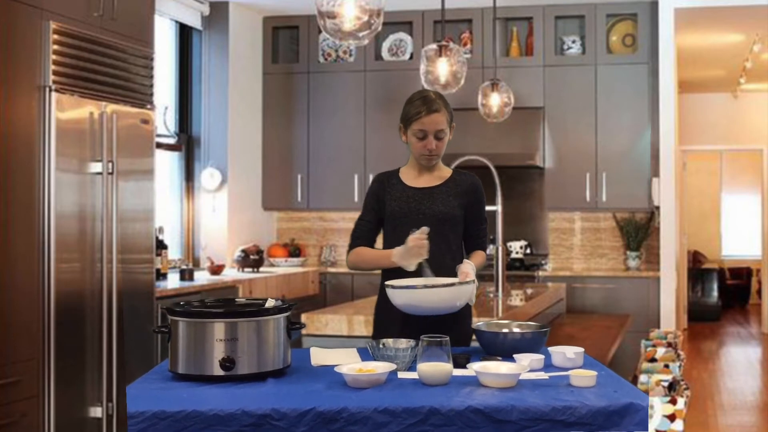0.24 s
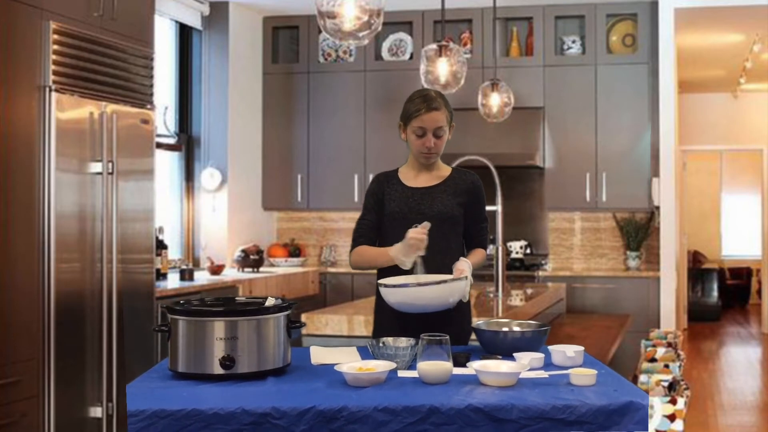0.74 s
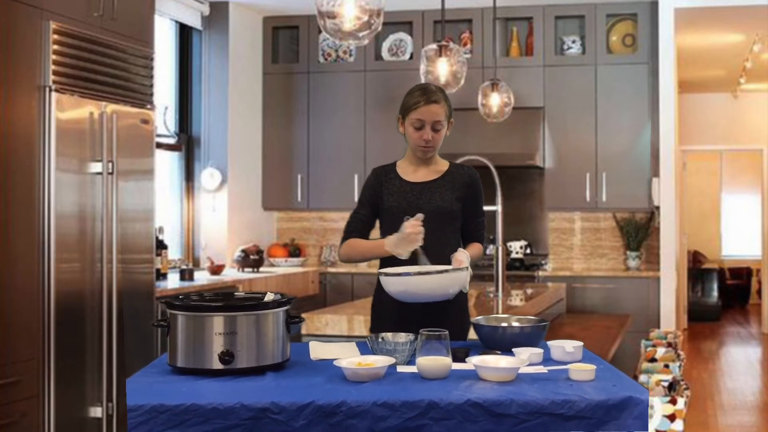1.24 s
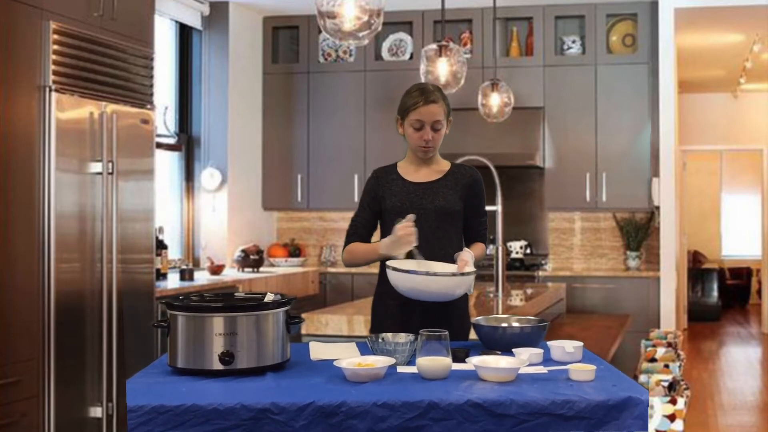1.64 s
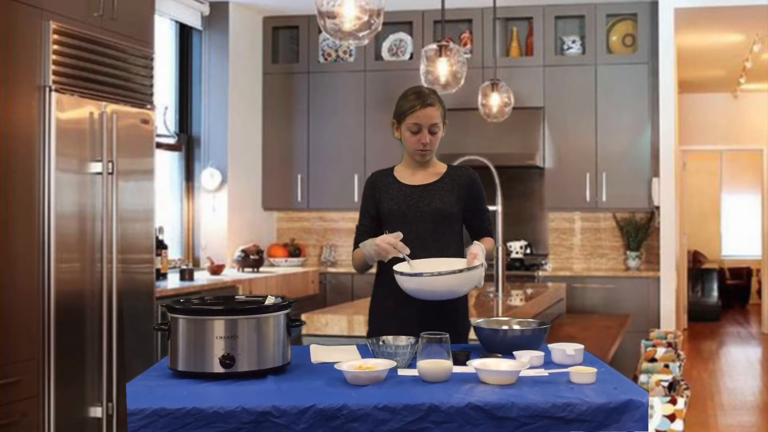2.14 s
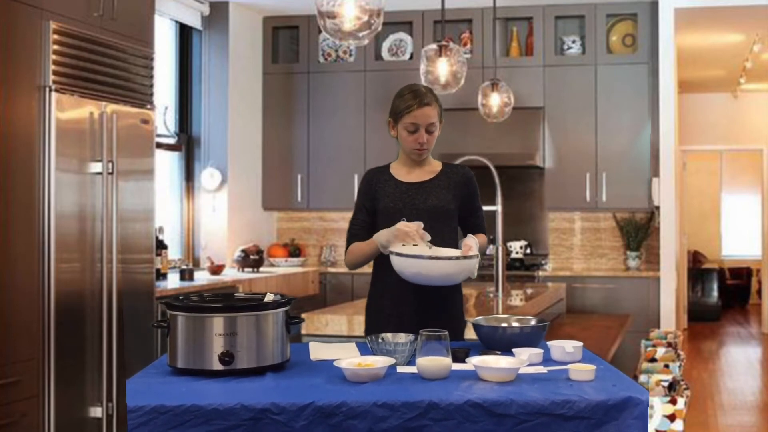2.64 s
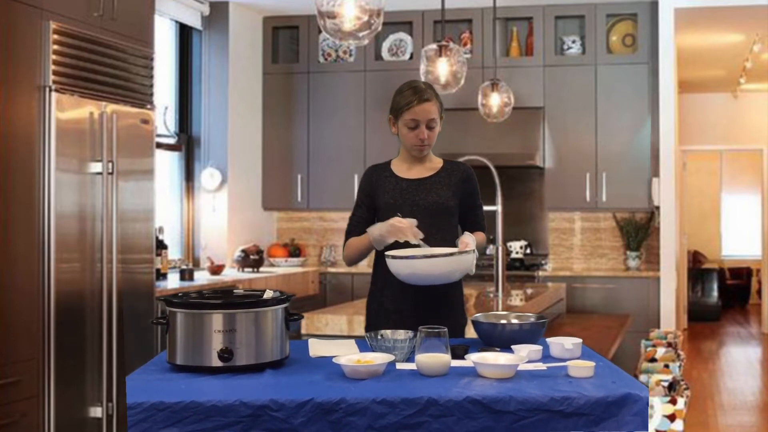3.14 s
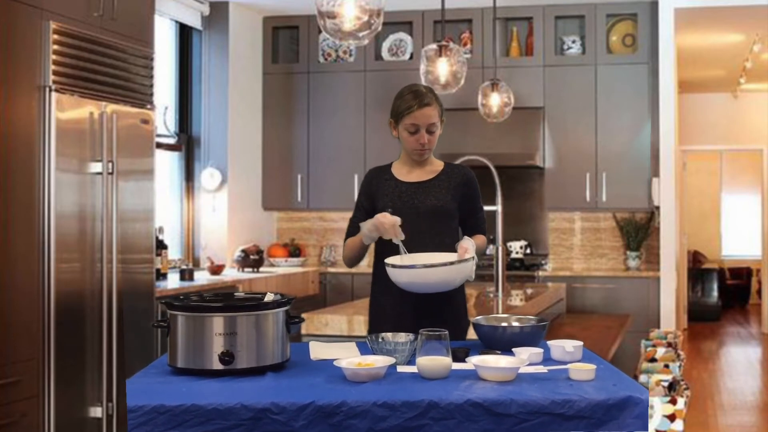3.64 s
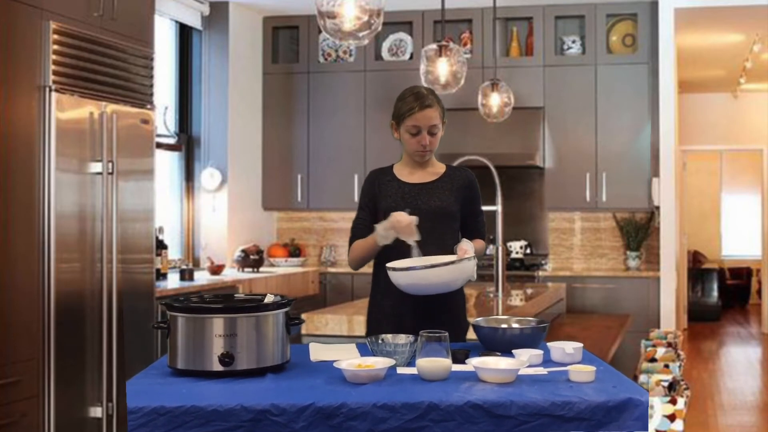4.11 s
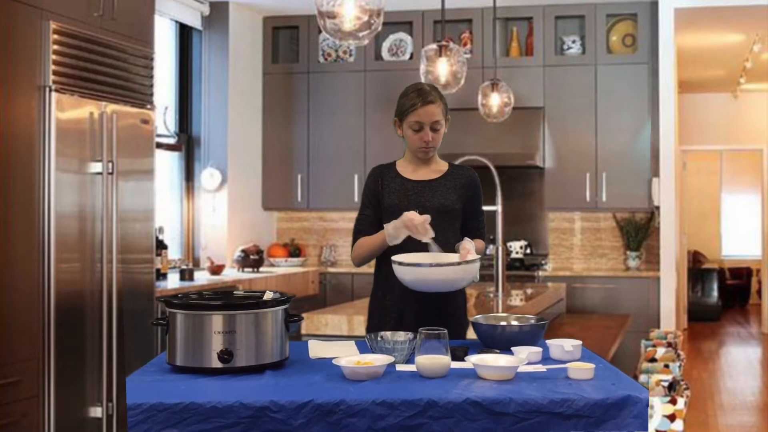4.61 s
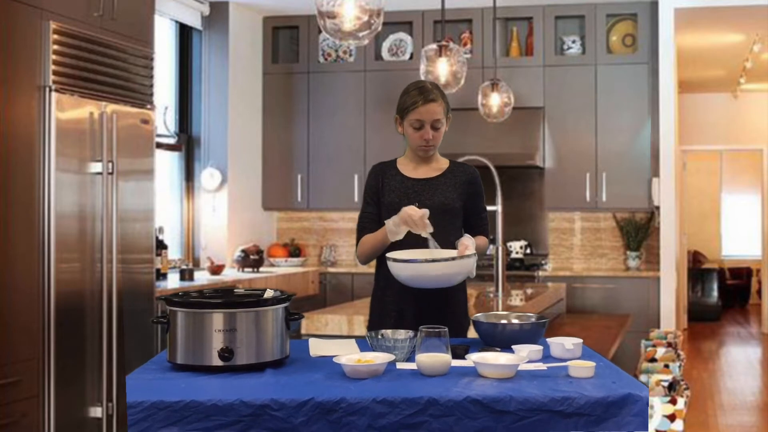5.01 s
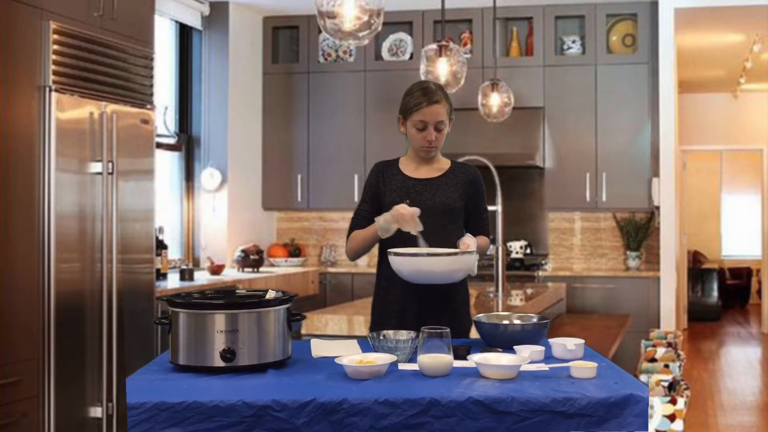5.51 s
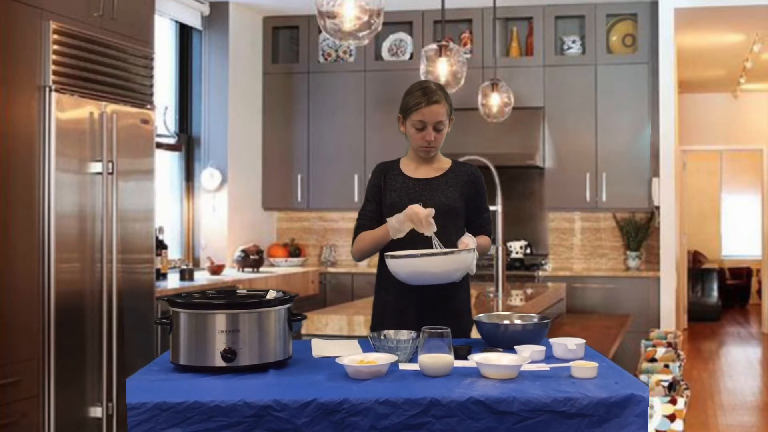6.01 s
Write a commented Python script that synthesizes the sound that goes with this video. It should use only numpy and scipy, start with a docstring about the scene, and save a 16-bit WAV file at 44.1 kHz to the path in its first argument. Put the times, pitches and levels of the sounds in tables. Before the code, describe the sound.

Over the low rumble and drone of kitchen appliances and ventilation, a whisk clicks irregularly against a ceramic bowl. Each hit gives a small, damped clink, mixed with brief scrapes on the glaze and the soft swish of dry flour. The stirring eases early on and then picks up again until the end. It is heard from a few metres away, with a short, dense room echo.

```python
"""A swish and a knock: a wire whisk stirs dry flour in a large hand-held ceramic bowl, a few metres away.
The wires hit the wall and make it ring briefly, scrape along the glaze and push the flour about.
The open kitchen answers with a short, dense echo.
Underneath, appliances and ventilation rumble, with two droning notes."""
import sys
import numpy as np
from scipy import signal
from scipy.fft import rfft, irfft, next_fast_len
from scipy.io import wavfile

SR = 44100
rng = np.random.default_rng(int(sys.argv[2]) if len(sys.argv) > 2 else 0)


def master(y):
    """Save y as 16-bit WAV."""
    cut = np.clip(np.atleast_2d(y).T, -1, 1)
    pcm = np.round(cut * 32767)  # scale
    wavfile.write(sys.argv[1], SR, pcm.astype(np.int16))


N = 276066

def from_db(db):
    """Turn decibels into a gain."""
    return 10 ** (np.asarray(db) / 20)

def rms_one(x):
    """Scale a sound to an average (rms) size of 1."""
    return x / np.sqrt(np.mean(x ** 2) + 1e-20)

def at_hz(points, hz):
    """Read between a table's rows, with octaves evenly spaced."""
    table_hz, values = np.transpose(points)
    return np.interp(np.log(hz), np.log(table_hz), values)

def coloured(x, spectrum):
    """Give a sound a tone colour, at rms 1."""
    size = next_fast_len(N)
    hz = np.maximum(np.arange(size // 2 + 1) * SR / size, 1)
    shaped = rfft(x, size) * from_db(at_hz(spectrum, hz))
    return rms_one(irfft(shaped, size)[:N])

def resonance(x, hz, width_hz):
    """Let through the sound near one pitch."""
    r = np.exp(-np.pi * width_hz / SR)
    feedback = [1, -2 * r * np.cos(2 * np.pi * hz / SR), r * r]
    return signal.lfilter(np.array([1, 0, -1]) * (1 - r * r) / 2, feedback, x)

def ring(clicks, hz, fade_s):
    """Each click starts a tone that fades by 60 dB in fade_s."""
    r = from_db(-60 / (fade_s * SR))
    w = 2 * np.pi * hz / SR
    return signal.lfilter([0, np.sin(w)], [1, -2 * r * np.cos(w), r * r], clicks + 1e-18)

def grains(shape, per_s, spread_db):
    """Random clicks of uneven size and sign."""
    sizes = from_db(spread_db * (np.minimum(rng.exponential(1, shape), 4) - 2))
    return sizes * rng.choice([-1, 1], shape) * (rng.random(shape) < per_s / SR)

def tint(sounds, edges_hz, levels_db):
    """Split each sound into bands, low to high, and set their levels."""
    bands = [signal.butter(2, edge, "band", fs=SR, output="sos") for edge in zip(edges_hz, edges_hz[1:])]
    return sum(signal.sosfilt(band, sounds) * from_db(db)[:, None] for band, db in zip(bands, levels_db))

def place(sounds, starts_s):
    """Put each sound at its start time."""
    out = np.zeros(N + sounds.shape[1])
    for start, sound in zip((starts_s * SR).astype(int), sounds):
        out[start:start + len(sound)] += sound
    return out[:N]

# Tone colours of the rumble and the airy hiss: f/Hz, relative level/dB
RUMBLE_COLOUR = [(21, 0), (40, -24), (52, -1), (86, -3), (113, -2.5), (205, -12.5), (346, -20.5),
                 (407, -28.5), (577, -30), (900, -39), (1170, -85), (1980, -120)]
AIR_COLOUR = [(470, -55), (800, -15), (943, -5.5), (1410, -10.5), (1490, -41), (3500, -13.5), (9740, -25.5),
              (16400, -23.5)]
# The two droning notes: f/Hz, width/Hz, level/dB
DRONE_NOTES = [(107, 14, -48), (163, 12, -55)]
def appliances():
    """Machines and ventilation rumble and hiss; narrow bands of noise make wavering drones."""
    out = from_db(-41.5) * coloured(rng.standard_normal(N), RUMBLE_COLOUR)
    out += from_db(-71) * coloured(rng.standard_normal(N), AIR_COLOUR)
    for hz, width_hz, level_db in DRONE_NOTES:
        noise = rng.standard_normal(N + SR)
        drone = resonance(resonance(noise, hz, width_hz), hz, width_hz)
        out += from_db(level_db) * rms_one(drone[SR:])
    return out

# How long the room rings: f/Hz, time to fade by 60 dB/s
ECHO_FADES = [(300, 0.29), (1000, 0.31), (3000, 0.36), (8000, 0.39), (14000, 0.082)]
def kitchen_echo(x):
    """Many echoes blur into a tail in which each octave fades at its own rate."""
    t = np.arange(SR // 2) / SR
    tail = np.zeros(len(t))
    for low_hz in 140 * 2.0 ** np.arange(7):
        band = signal.butter(2, [low_hz, 2 * low_hz], "band", fs=SR, output="sos")
        fade_s = at_hz(ECHO_FADES, low_hz * np.sqrt(2))
        tail += signal.sosfilt(band, rng.standard_normal(len(t))) * from_db(-60 * t / fade_s)
    tail *= np.clip(t / 0.003, 0, 1) ** 2   # echoes build up over 3 ms
    tail *= 1 + from_db(-17) * np.exp(-t / 0.024)   # table and cupboards answer first and strongest
    return signal.fftconvolve(x, tail / np.sqrt(np.sum(tail ** 2)))[:N]

# How loud the stirred flour is: t/s, level/dB
STIRRING = [(0.0, -55.5), (0.12, -66), (0.59, -62.5), (0.87, -67.5), (1.18, -60.5), (1.4, -64.5),
            (2.5, -69.5), (2.68, -59.5), (2.88, -59), (3.01, -69.5), (3.4, -57.5), (3.82, -66),
            (4.05, -68.5), (4.99, -63.5), (5.35, -75), (5.95, -66.5), (6.121, -66), (6.26, -68.5)]
# Its tone colour: f/Hz, relative level/dB
FLOUR_COLOUR = [(290, 3), (500, 5), (809, -7.5), (1450, -3.5), (2030, -9), (7120, -16.5), (8730, -19.5),
                (11500, -14), (16400, -41)]
def flour():
    """Fine grains slip through the wires; their tiny clicks blend into a swish."""
    times_s, level_db = np.transpose(STIRRING)
    stir = from_db(np.interp(np.arange(N) / SR, times_s, level_db))
    return stir * coloured(grains(N, per_s=10000, spread_db=1.5), FLOUR_COLOUR)

# Edges of a scrape's four bands: f/Hz
SCRAPE_EDGES = [350, 900, 2700, 6800, 11500]
# Wires dragging on the glaze: t/s, level/dB, brightness/(dB per octave), time to peak/s
SCRAPES = [(0.0356, -56, -2.5, 0.0025), (0.1189, -62, -2, 0.013), (0.3067, -61.5, -0.9, 0.02),
           (0.387, -74, 7.5, 0.0087), (0.6021, -62.5, -0.5, 0.011), (0.8111, -57.5, 0.8, 0.022),
           (0.9938, -58.5, -0.5, 0.0099), (1.294, -53.5, 1, 0.014), (1.7345, -53, 0.5, 0.0078),
           (1.7996, -55, 0.2, 0.0065), (2.024, -81.5, 10, 0.01), (2.1082, -65.5, 1.5, 0.0089),
           (2.245, -72.5, 3.5, 0.0073), (2.4947, -62, 0.5, 0.011), (2.5298, -59.5, 0.5, 0.0062),
           (2.7645, -51, 1.5, 0.013), (3.2246, -55, -0.5, 0.013), (3.2475, -70, 5.5, 0.0053),
           (3.6124, -49.5, 0.2, 0.01), (3.6894, -63.5, 4, 0.004), (3.7705, -61, 0.3, 0.022),
           (3.9826, -58, 1, 0.012), (4.0294, -54, 1.5, 0.0069), (4.111, -58.5, -1.5, 0.013),
           (4.3841, -54.5, 0.2, 0.022), (4.5244, -63.5, -1.2, 0.022), (4.7995, -49.5, 1.3, 0.015),
           (4.962, -56, -0.4, 0.0097), (5.2345, -52, 0, 0.005), (5.3263, -53, 1, 0.0072),
           (5.576, -57.5, 2, 0.014), (6.1347, -59, -2.5, 0.011)]
def scrapes():
    """Grit under the wires makes dense clicks that swell and die away."""
    starts_s, level_db, tilt_db, rise_s = np.transpose(SCRAPES)
    progress = np.arange(SR // 6) / SR / np.clip(rise_s, .002, .03)[:, None]
    swell = progress * np.exp(1 - progress)
    grit = swell * rms_one(grains(progress.shape, per_s=5500, spread_db=6))
    makeup_db = 10 * np.log10(SR / 2 / np.diff(SCRAPE_EDGES))   # evens out narrow and wide bands
    usual_db, pivot_hz = [4.55, 4.14, 0.5, -5], 2270
    centres_hz = np.sqrt(np.multiply(SCRAPE_EDGES[1:], SCRAPE_EDGES[:-1]))
    brightness_db = np.outer(np.log2(centres_hz / pivot_hz), tilt_db)
    colour_db = level_db + (makeup_db + usual_db)[:, None] + brightness_db
    return place(tint(grit, SCRAPE_EDGES, colour_db), starts_s)

# The bowl's tones, cut short by hand and flour: f/Hz, relative level/dB, time to fade by 60 dB/s
BOWL_TONES = [(360, -5, 0.059), (630.4, 6.5, 0.048), (997, 1, 0.021), (1127, 0, 0.029), (1221, -5, 0.078),
              (1618, 6, 0.02), (1877, -0.5, 0.021), (2162, 5, 0.016), (2465, -3, 0.023), (2550, -9, 0.043),
              (3010, 2.5, 0.017), (3160, 5, 0.0055), (4180, 14.5, 0.0086), (5026, 8.5, 0.0059),
              (5590, 10.5, 0.0065)]
# Edges of a knock's six bands (thud, hollow, ring, clink, clack, tick): f/Hz
KNOCK_EDGES = [350, 850, 1350, 2000, 3600, 6800, 12500]
# Wires hitting the wall: t/s, belly thud/dB, wall ring/dB, rim clink/dB, wire tick/dB
WIRE_HITS = [(0.034, -48, -40.5, -48, -44), (0.328, -47.5, -49.5, -57, -56),
             (0.4683, -42, -29.5, -32, -35.5), (0.8118, -55, -43, -47, -46.5),
             (0.9722, -49.5, -44.5, -51, -46), (1.0912, -69, -60, -58.5, -49.5),
             (1.1511, -37.5, -27, -29.5, -33), (1.293, -48.5, -41.5, -42, -39),
             (1.3482, -46, -44.5, -45.5, -50), (1.516, -55.5, -43.5, -44.5, -37),
             (1.6012, -48.5, -49.5, -58, -51.5), (1.7327, -47, -40, -42.5, -42),
             (2.6934, -62, -47.5, -42.5, -46), (2.8844, -54, -44.5, -47, -46),
             (2.956, -54, -55, -50.5, -43.5), (2.9998, -50, -45, -49.5, -54),
             (3.2957, -51.5, -50, -51, -44), (3.4137, -42.5, -34.5, -35, -36.5),
             (3.5092, -68, -57, -48, -52), (3.6079, -39.5, -42, -39.5, -36), (3.7474, -53, -56, -51, -50),
             (3.7705, -48.5, -45, -47, -46.5), (3.8247, -61, -48.5, -48.5, -59),
             (4.018, -48.5, -42.5, -48, -40.5), (4.1062, -48, -44, -44, -43), (4.364, -59, -49, -45, -45),
             (4.372, -42.5, -31.5, -37.5, -37), (4.3961, -50, -38, -39, -43),
             (4.5193, -51.5, -51, -46.5, -47), (4.8108, -38, -34.5, -37.5, -35.5),
             (5.023, -57, -46.5, -48.5, -52), (5.2339, -38.5, -35.5, -35.5, -39.5),
             (5.2434, -34.5, -50, -52, -57), (5.3203, -68, -62, -60, -54), (5.328, -51, -47.5, -55, -38),
             (5.3356, -44.5, -39, -40.5, -76), (5.394, -48, -43, -46, -46.5),
             (5.558, -56, -54, -55.5, -51.5), (5.5893, -48, -45.5, -44.5, -47),
             (5.7194, -64, -40.5, -45.5, -47), (5.832, -71, -49.5, -59.5, -50.5),
             (5.8498, -53, -53.5, -50, -53), (5.8908, -54.5, -54.5, -51.5, -48),
             (6.021, -54.5, -40.5, -41, -42)]
def knocks():
    """One wire lands, others rattle just after it, and all the bowl's tones ring."""
    starts_s, thud_db, ring_db, clink_db, tick_db = np.transpose(WIRE_HITS)
    t = np.arange(SR // 8) / SR
    rattle_s, crack_s, crack_rise_s = 0.017, 0.014, 0.00057
    rattle = grains((len(starts_s), len(t)), per_s=460, spread_db=1.0)
    clicks = from_db(-4.5) * np.exp(-t / rattle_s) * rattle
    clicks[:, 0] = 1   # the first wire
    clicks /= np.sqrt(np.sum(clicks ** 2, axis=1, keepdims=True))   # the wires share the blow's energy
    strength = from_db(1.5 * rng.standard_normal((len(starts_s), len(BOWL_TONES))))
    strength *= (-1) ** np.arange(len(BOWL_TONES))   # neighbouring tones start in opposite directions
    body = sum(ring(clicks, hz, fade_s) * from_db(level_db) * strength[:, [k]]
               for k, (hz, level_db, fade_s) in enumerate(BOWL_TONES))
    # each blow also draws a sharp cracking sound from the glaze
    crack = np.exp(-t / crack_s) * rms_one(grains(clicks.shape, per_s=5500, spread_db=6))
    crack *= np.minimum(t / crack_rise_s, 1)
    treble = signal.butter(2, 3280, "high", fs=SR, output="sos")
    body += from_db(-7.5) * signal.sosfilt(treble, crack + 0.97 * clicks)
    hollow_db = thud_db + 0.38 * (ring_db - thud_db) + 3.5
    clack_db = clink_db - 5.5
    colour_db = [thud_db, hollow_db, ring_db, clink_db, clack_db, tick_db]
    return place(tint(body, KNOCK_EDGES, colour_db), starts_s)

def scene():
    """The whisking and its echo, over the hum of the appliances."""
    bowl = knocks() + scrapes() + flour()
    return (bowl + from_db(-4.5) * kitchen_echo(bowl) + appliances())[None]

def record(dry):
    """The deep bass is cut, a narrow treble band near 9 kHz is lifted, and the very top is cut off."""
    bass_hz, lift_hz, width_hz, top_hz = 54, 8815, 2000, 15850
    dry = signal.sosfilt(signal.butter(4, bass_hz, "high", fs=SR, output="sos"), dry)
    treble = resonance(resonance(dry, lift_hz, width_hz), lift_hz, width_hz)
    top_cut = signal.ellip(10, .5, 50, top_hz, fs=SR, output="sos")
    return signal.sosfilt(top_cut, dry + from_db(8) * treble)

dry = scene()
out = record(dry)
master(out)
```